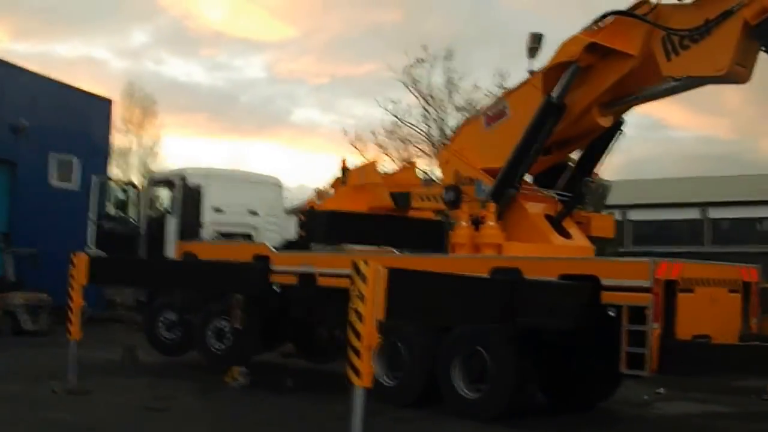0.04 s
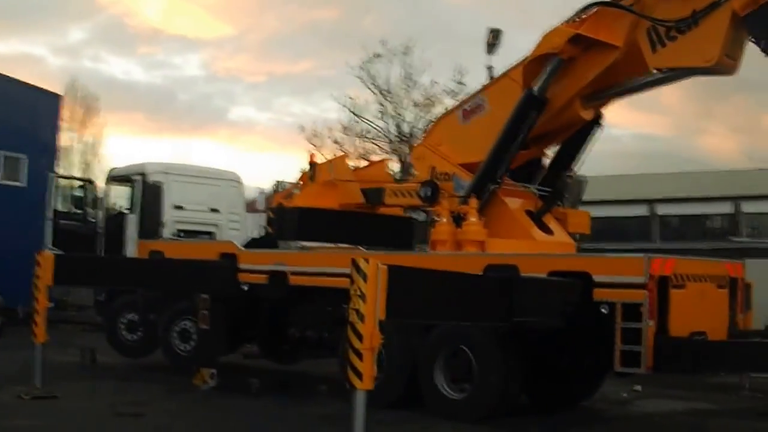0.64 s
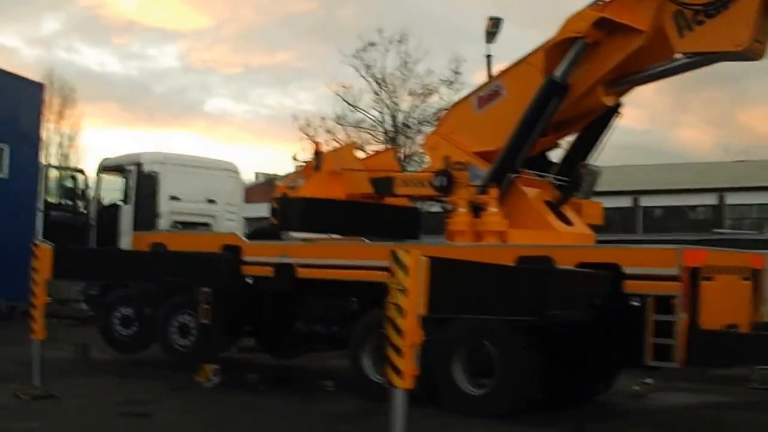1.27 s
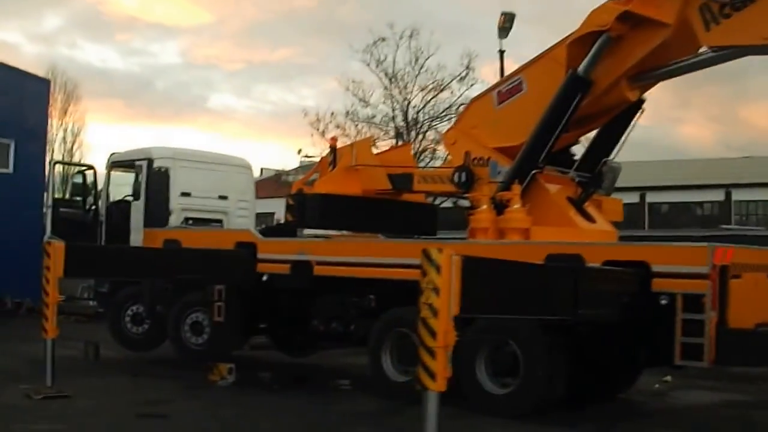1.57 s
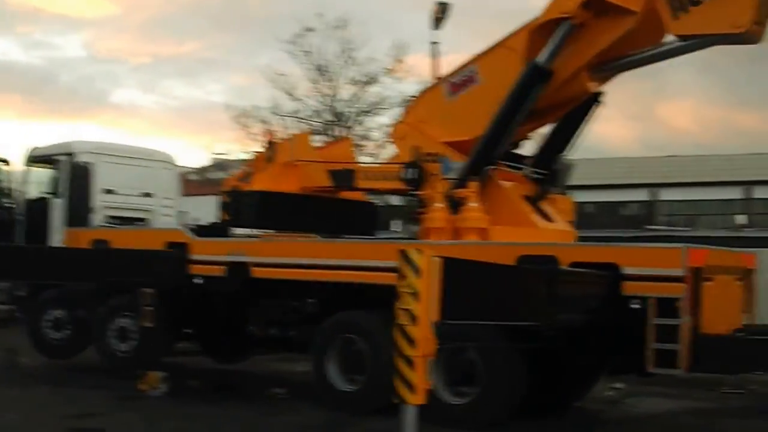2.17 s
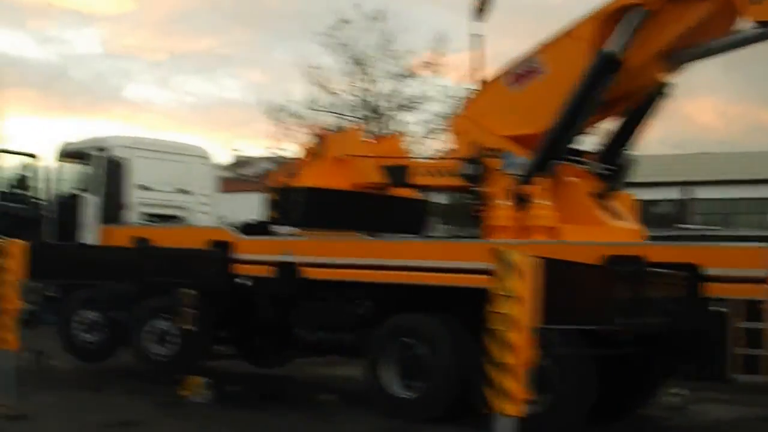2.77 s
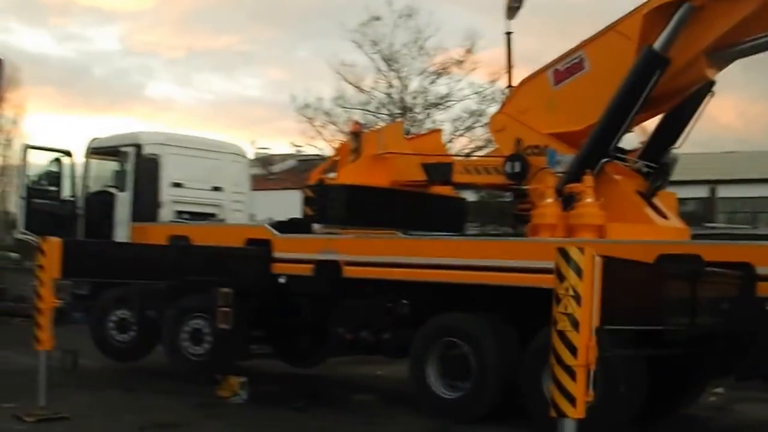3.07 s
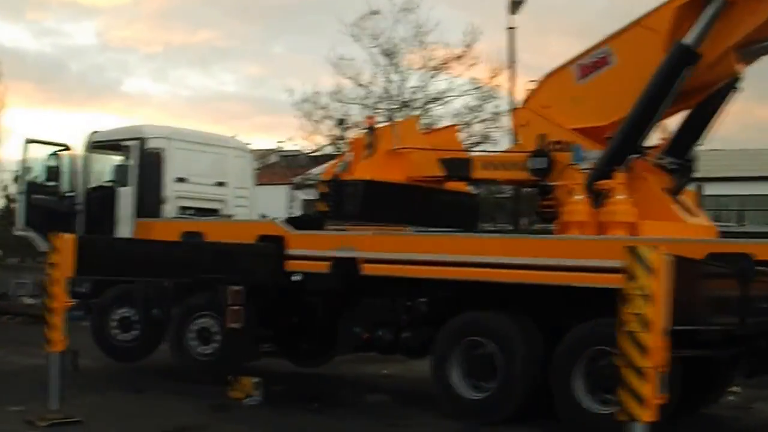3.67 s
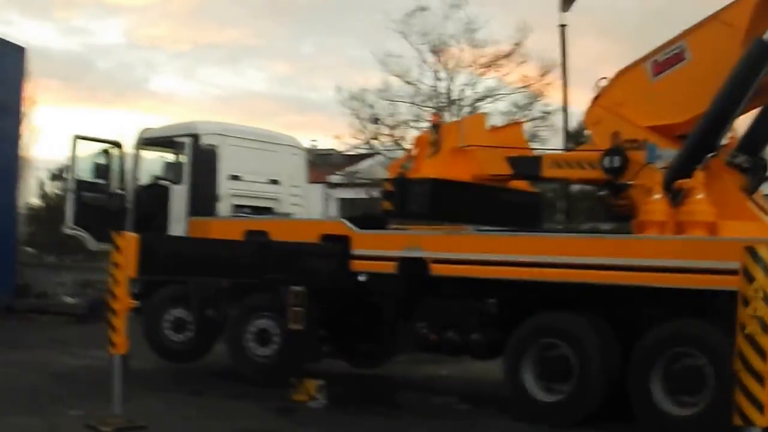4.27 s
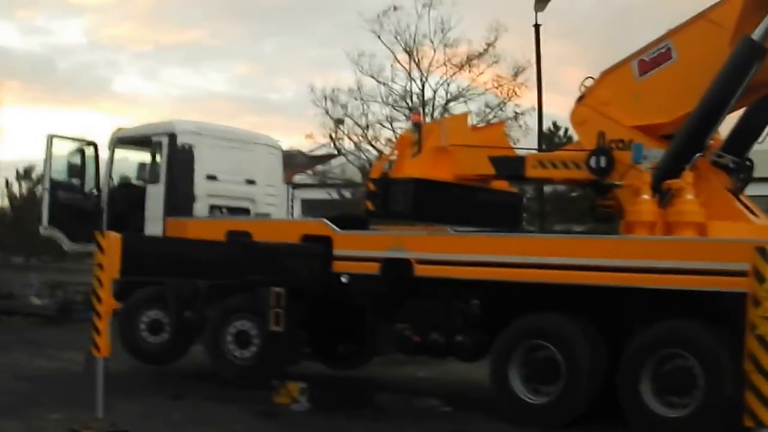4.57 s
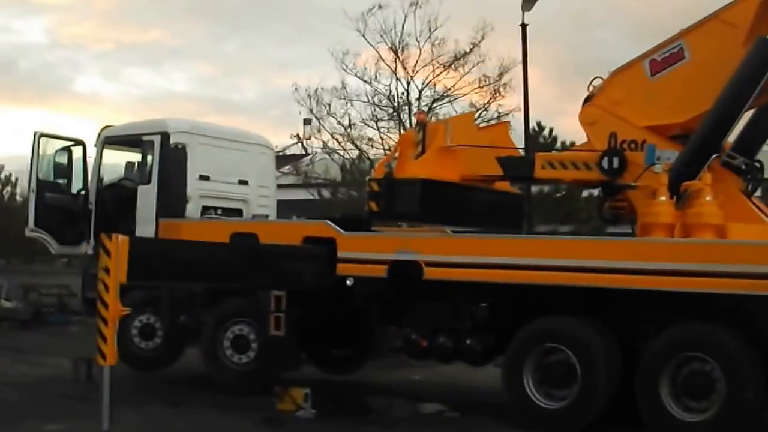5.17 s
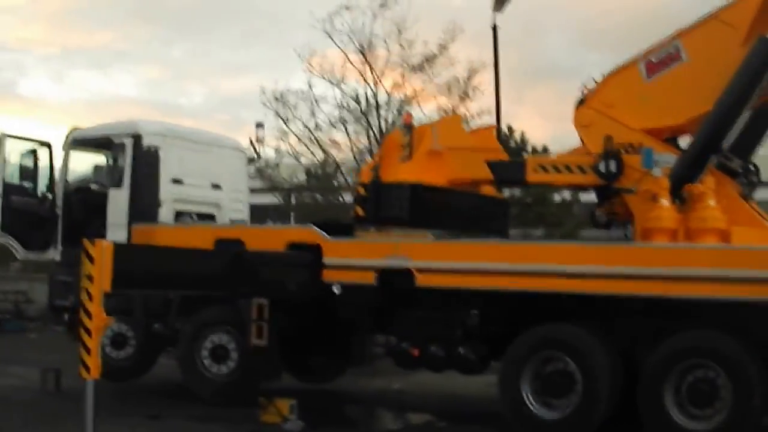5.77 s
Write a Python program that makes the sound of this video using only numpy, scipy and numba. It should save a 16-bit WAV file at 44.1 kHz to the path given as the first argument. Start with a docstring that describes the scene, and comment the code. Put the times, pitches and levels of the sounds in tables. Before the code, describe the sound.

A crane truck's diesel engine drones at fast idle with a steady hydraulic whine and hiss, while light wind rumbles on the microphone.

```python
"""Crane truck at fast idle

A six-cylinder diesel drives the crane's hydraulic pump in an open yard. The exhaust drones, the block
clatters in surges, the pump whines and hisses; its tones swell and fade as the listener walks past.
Gusts rumble on the microphone, the machine's level dips briefly, a limiter snaps down on the peaks."""
import sys
import numpy as np
from scipy import signal
from scipy.fft import rfft, irfft, next_fast_len
from scipy.io import wavfile
from numba import njit

SR = 44100
rng = np.random.default_rng(int(sys.argv[2]) if len(sys.argv) > 2 else 0)


def unload_audio(sound):
    """Save the sound as a 16-bit wav file, at the path given as the first command line argument."""
    columns = np.transpose(np.atleast_2d(sound))
    # keep every value between -1 and 1, then stretch to whole-number steps
    steps = np.round(np.clip(columns, -1, 1) * 32767)
    wavfile.write(sys.argv[1], SR, steps.astype(np.int16))


N = 257103
TIME = np.arange(N) / SR
FIRING_HZ, PUMP_HZ, FAN_HZ = 57.0, 145.5, 29.9


def exhaust(clock_s, firing_db=1.16, orders_db=0.66, unsteady_db=3.0, chug_db=1.0):
    """Three firings a crank turn make the drone; unequal cylinders add whole and half orders."""
    # firing tone along the walk: t/s, level/dB
    firing_levels = [(0, -15), (.6, -18.5), (.95, -15.5), (2.0, -13), (2.9, -13.5), (3.55, -13),
                     (4.45, -14), (5.2, -13.2), (5.8, -11.5)]
    # higher exhaust tones: multiple of crank speed, level/dB
    orders = [(4.5, -43.5), (6, -32.5), (7.5, -38.5), (9, -40.5), (10, -43), (10.5, -49), (11, -48),
              (12, -40), (13, -38.5), (13.5, -43), (14, -41), (15, -42.5), (16, -43.5), (17, -51.5),
              (25, -46.5), (32, -44.5), (34, -55), (35, -41), (36, -54)]
    crank_turns = clock_s * FIRING_HZ / 3
    firing_gain = amp(firing_db + chug_db * drift(16)) * curve(firing_levels)
    drone = firing_gain * tone(clock_s * FIRING_HZ + rng.random())
    for order, db in orders:
        gain = amp(db + orders_db + unsteady_db * drift(2.4))
        drone += gain * tone(crank_turns * order + rng.random())
    return drone


def pump_whine(clock_s, leading_db=2.0, buzz_db=3.5, scatter=0.94):
    """Each piston stroke is a sharp pressure pulse; yard echoes shift its harmonics along the walk."""
    # spectrum of the weaker harmonics: f/Hz, level/dB
    buzz_spectrum = [(870, -40), (1160, -39.5), (1550, -42), (2000, -40.5), (2200, -41), (2760, -42),
                     (2950, -50), (3250, -60.5), (3900, -52.5), (4750, -47), (5250, -48), (5900, -56),
                     (7000, -77)]
    strokes, leading = clock_s * PUMP_HZ, leading_harmonic_gains()
    whine, buzz = np.zeros(N), np.zeros(N)
    for k in range(1, 46):
        # low harmonics ring through the chassis and lose their step; high ones arrive together
        turns = k * strokes + rng.random() * (k < 14)
        if k in leading:
            whine += leading[k] * tone(turns + 0.033 * drift(1.5))
        else:
            paths = unit(1 + scatter * (drift(1.9) + 1j * drift(1.2)))  # direct sound + echoes
            gain = amp(at_hz(buzz_spectrum, k * PUMP_HZ)) * abs(paths)
            buzz += gain * tone(turns + np.angle(paths) / (2 * np.pi))
    return amp(leading_db) * whine + receding(buzz_db, fade_db_per_s=0.86) * buzz


def leading_harmonic_gains():
    """Direct sound and echo slide in and out of step for each leading pump harmonic."""
    # 4th and 5th harmonics along the walk: t/s, level/dB
    fourth = [(0, -32), (.35, -27.5), (1.35, -25.5), (1.6, -33), (2.0, -24.5), (2.95, -24), (3.6, -32),
              (3.9, -28.5), (4.6, -26), (5.15, -45), (5.55, -27)]
    fifth = [(0, -24), (.7, -25.5), (1.55, -23), (2.1, -28), (3.05, -27.7), (3.65, -33), (4.35, -28.5),
             (4.7, -36.5), (5.2, -28), (5.75, -33.5)]
    # the others: harmonic, start level/dB, fade/(dB/s), echo/direct ratio, beat period/s, trough t/s
    beating = [(1, -25.0, 2.5, 0.2, 3.5, 0.647), (2, -34, 1.5, 0.59, 5.3, 0.08),
               (3, -28, 2.25, 0.2, 2.4, 1.95), (7, -37.5, 0, 0.62, 5.1, 2.6),
               (9, -39, -0.5, 0.55, 1.05, 2.6), (17, -32.5, 1, .55, 2.48, 2.78),
               (18, -36, 2.1, .6, 4.2, 0.86)]
    gains = {4: curve(fourth), 5: curve(fifth)}
    for k, start_db, fade_db_per_s, echo, period_s, trough_s in beating:
        interference = abs(1 - echo * np.exp(2j * np.pi * (TIME - trough_s) / period_s))
        gains[round(k)] = receding(start_db, fade_db_per_s) * interference
    return gains


def engine_block(clock_s, knock=0.36, decay_firings=0.626, uneven=0.43, flutter_db=0.87):
    """Every firing knocks the block a little differently, over the steady churn of gears and fan air."""
    # spectra of block clatter, panel ring and low boom: f/Hz, level/dB
    clatter_spectrum = [(150, -22), (360, -8.5), (480, -4), (660, -7), (880, -8), (1100, -3.5), (1300, -3),
                        (1500, -5), (2000, -5), (2650, -7), (2950, -17.5), (4500, -18), (7000, -30.5),
                        (15500, -50)]
    panel_spectrum = [(200, -63), (440, -16), (550, -5), (660, -0.5), (740, -4.5), (840, -13.5),
                      (2000, -50)]
    boom_spectrum = [(40, -15), (90, 4), (150, 3), (260, -1), (350, -15), (500, -11), (1200, -38),
                     (5000, -80)]
    # panel ring along the walk: t/s, level/dB
    panel_levels = [(0, -26), (.95, -28.5), (1.4, -26.5), (2.6, -28), (3.05, -26.5), (3.55, -30),
                    (3.95, -26), (4.65, -27), (5.15, -31.5), (5.7, -27)]
    firings = clock_s * FIRING_HZ + 1
    index = firings.astype(int)
    per_cylinder = rng.standard_normal(6)[index % 6]
    per_firing = rng.standard_normal(index[-1] + 1)[index]
    force = 1 + uneven * (per_cylinder + per_firing)
    knocks = 1 + knock * force * np.exp(-(firings % 1) / decay_firings)
    flutter = amp(flutter_db * drift(17))
    clatter = receding(-19.0, fade_db_per_s=0.68) * noise(clatter_spectrum, knocks * flutter)
    panels = amp(-0.5) * curve(panel_levels) * noise(panel_spectrum, knocks)
    boom = receding(-26.5, fade_db_per_s=1.0) * noise(boom_spectrum, knocks)
    return clatter + panels + boom


def cooling_fan(clock_s, level_db=-21.0, unsteady_db=1.5, smear_turns=0.12):
    """The fan's slight imbalance throbs once a turn."""
    gain = amp(level_db - unsteady_db * drift(2.8))
    return gain * tone(clock_s * FAN_HZ + smear_turns * drift(1.7) + rng.random())


def oil_hiss(clock_s, spurt=0.99, decay_strokes=0.3, flutter_db=1.83):
    """Oil spurts through the pump's ports at every stroke and sizzles in the valve block."""
    # spectra of port hiss and valve sizzle: f/Hz, level/dB
    hiss_spectrum = [(800, -20), (2600, -1.5), (3200, -4), (3600, -0.5), (4200, -0.5), (5000, -4.5),
                     (6000, -9.5), (7200, -22.5), (8800, -22.5), (10300, -27), (11000, -37), (13000, -33),
                     (15500, -42)]
    valve_spectrum = [(2000, -52), (4100, -26), (4700, -3), (5350, -2), (5900, -10.5), (6800, -22.5),
                      (12000, -54.5)]
    # valve sizzle along the walk: t/s, level/dB
    valve_levels = [(0, -32.5), (.7, -36.5), (1.7, -30), (2.68, -34.5), (2.8, -27.5), (3.05, -34),
                    (3.55, -35.5), (3.95, -34.5), (5.1, -39), (5.83, -36)]
    spurts = 1 + spurt * np.exp(-(clock_s * PUMP_HZ % 1) / decay_strokes)
    spurts *= amp(flutter_db * drift(20))
    hiss = receding(-29.5, fade_db_per_s=1.18) * noise(hiss_spectrum, spurts)
    sizzle = amp(-1.1) * curve(valve_levels) * noise(valve_spectrum, spurts)
    return hiss + sizzle


def wind(rumble_db=-23.5, buffet_db=-31.0, gust_rumble_db=-1.5, gust_buffet_db=2.0, eddy_db=3.0):
    """A light breeze rumbles on the microphone; gusts swell it and buffet it higher up."""
    # spectra of rumble and buffeting: f/Hz, level/dB
    rumble_spectrum = [(2, -24.5), (10, -7), (22, 3), (40, -6), (62, -4), (100, -22.5), (160, -32),
                       (400, -47), (2000, -92)]
    buffet_spectrum = [(30, -14), (70, 6.5), (90, -0.5), (130, -0.5), (200, -13), (400, -40), (2000, -80)]
    # gusts: t/s, half length/s, rumble level/dB, buffet level/dB
    gusts = [(.02, 0.065, -19, -32), (0.227, .04, -12, -32), (0.513, 0.11, -17, -23.5),
             (0.824, 0.074, -15, -27), (1.39, 0.034, -21, -30), (2.37, 0.053, -30, -35),
             (2.795, .05, -24, -29), (3.635, .1, -25, -29), (4.525, .07, -13.5, -23),
             (5.238, 0.12, -17, -33.5), (5.741, .05, -12, -39.5)]
    eddies = amp(eddy_db * drift(10))
    rumble_power, buffet_power = amp(rumble_db) ** 2, amp(buffet_db) ** 2
    for t_s, half_length_s, low_db, high_db in gusts:
        gust = bump(t_s, half_length_s)
        rumble_power += amp(gust_rumble_db + low_db) ** 2 * gust
        buffet_power += amp(gust_buffet_db + high_db) ** 2 * gust
    rumble = np.sqrt(rumble_power) * noise(rumble_spectrum, eddies)
    buffet = np.sqrt(buffet_power) * noise(buffet_spectrum, eddies)
    return rumble + buffet


def surge_gain():
    """The engine's clatter swells briefly."""
    # surges: t/s, half length/s, rise/dB
    surges = [(0.095, 0.032, 1.5), (1.663, 0.03, 0.5), (2.133, .03, 0.5), (2.373, 0.064, 3.5),
              (2.93, 0.063, 3.5), (3.964, 0.032, 0.5), (4.221, 0.026, 2.5), (4.321, .03, 4.5),
              (4.455, 0.057, 2.5), (4.744, 0.044, 1.5), (5.497, 0.066, 1.5), (5.72, .035, 4.5)]
    return amp(sum(db * bump(t_s, half_length_s) for t_s, half_length_s, db in surges))


def dip_gain(fall_s=0.015, recovery_s=0.09):
    """The machine's level falls quickly at each dip and creeps back."""
    # dips: t/s, nominal depth/dB
    dips = [(.19, 5), (.444, 2.5), (.64, 3.5), (.893, 6), (1.22, 6), (1.896, 3.0), (2.24, 3.5), (2.42, 6),
            (2.585, 3.8), (3.002, 2), (3.333, 2.5), (3.53, 6), (3.732, 0.5), (4.0, 6.5), (4.35, 3),
            (4.58, 3.5), (4.97, 4), (5.13, 5), (5.56, 5.5)]
    down_db = np.zeros(N)
    for t_s, depth_db in dips:
        age_s = np.maximum(TIME - t_s, 0)
        down_db += depth_db * np.minimum(age_s / fall_s, 1) * np.exp(-age_s / recovery_s)
    return amp(-down_db)


def noise(spectrum, envelope):
    """Stereo noise of rms 1, pulsed by an envelope, then rung through a spectrum."""
    # stereo image: f/Hz, left-right correlation
    correlations = [(100, 1), (1000, 1), (2500, 1), (5000, 0.9), (8000, .87), (14000, 0.97)]
    size = next_fast_len(N)
    hz = np.fft.rfftfreq(size, 1 / SR)
    mid, side = rfft(rng.standard_normal((2, N)) * envelope, size) * amp(at_hz(spectrum, hz))
    correlation = np.clip(at_hz(correlations, hz), 0, 1)
    mid, side = mid * np.sqrt(1 + correlation), side * np.sqrt(1 - correlation)
    return unit(irfft(np.array([mid + side, mid - side]), size)[:, :N])


def drift(rate_hz):
    """Random wander, rms about 1, low-passed at rate_hz."""
    frames_s = np.arange(4096) / 300
    hz = np.fft.rfftfreq(len(frames_s), frames_s[1])
    slow = irfft(rfft(rng.standard_normal(len(frames_s))) / np.sqrt(1 + (hz / rate_hz) ** 4))
    return np.interp(TIME, frames_s, unit(slow))


def tone(turns):
    """Cosine of rms 1."""
    return np.sqrt(2) * np.cos(2 * np.pi * turns)


def curve(points):
    """Gain along a table of t/s, level/dB."""
    return amp(np.interp(TIME, *np.transpose(points)))


def receding(start_db, fade_db_per_s):
    """Gain of a source as the listener walks away."""
    return amp(start_db - fade_db_per_s * TIME)


def bump(t_s, half_length_s):
    """Gaussian swell of height 1."""
    return np.exp(-((TIME - t_s) / half_length_s) ** 2)


def at_hz(points, hz):
    """Table value, interpolated over log frequency."""
    points_hz, values = np.transpose(points)
    return np.interp(np.log(hz + 1), np.log(points_hz + 1), values)


def amp(db):
    """Decibels to gain."""
    return 10 ** (np.asarray(db) / 20)


def unit(x):
    """Scale to rms 1."""
    return x / np.sqrt(np.mean(abs(x) ** 2) + 1e-20)


@njit
def limiter_gain(level, ceiling, step, recovery_s, lag_samples):
    """The gain drops one step just after a peak passes the ceiling, then creeps back."""
    gains, gain, due = np.ones(len(level)), 1.0, -1
    for n in range(len(level)):
        if n > due and level[n] * gain > ceiling:
            due = n + lag_samples
        if n == due:
            gain *= step
        gain += (1 - gain) / (recovery_s * SR)
        gains[n] = gain
    return gains


def scene():
    """Engine, fan and pump share one shaft, which the governor holds almost steady."""
    clock_s = np.cumsum(1 + 0.0007 * drift(1.5)) / SR
    surge, dip = surge_gain(), dip_gain()
    clatter = surge * engine_block(clock_s)
    pump = pump_whine(clock_s) + surge ** 0.64 * oil_hiss(clock_s)
    drone = surge ** 0.43 * exhaust(clock_s, curve_free := 1.16) + cooling_fan(clock_s)
    # the clatter dips most, the pump less, the deep drone least
    return dip * clatter + dip ** 0.85 * pump + dip ** 0.4 * drone + wind()


def record(dry):
    """Two close microphone ports, a stepping peak limiter and a band limit; the bass is mono."""
    mono_below_hz, edge_hz = 420, 15750
    left, right = np.append(dry[0, 0], dry[0, :-1]), dry[1]  # left port one sample later
    highpass = signal.butter(3, mono_below_hz, "highpass", fs=SR, output="sos")
    mid = (left + right) / 2
    side = 0.9 * signal.sosfiltfilt(highpass, (left - right) / 2)
    ports = np.array([mid + side, mid - side]) * signal.windows.tukey(N, 100 / N)
    gain = limiter_gain(abs(ports).max(0), ceiling=0.65, step=amp(-1.2), recovery_s=0.1, lag_samples=24)
    lowpass = signal.firwin(801, edge_hz, window=("kaiser", 9), fs=SR)
    return signal.oaconvolve(ports * gain, lowpass[None], "same")


dry = scene()
out = record(dry)
unload_audio(out)
```